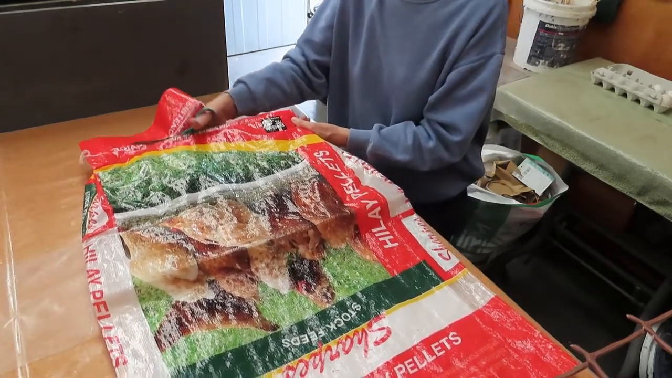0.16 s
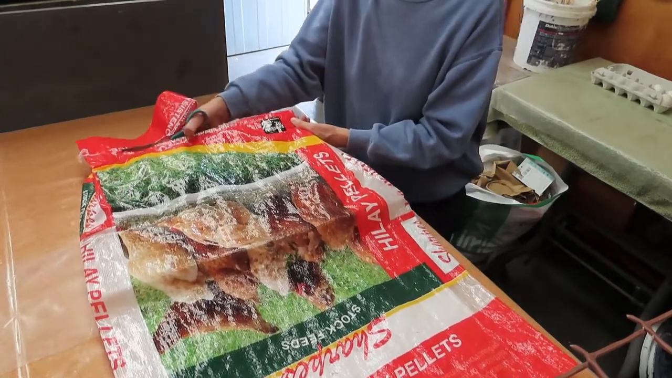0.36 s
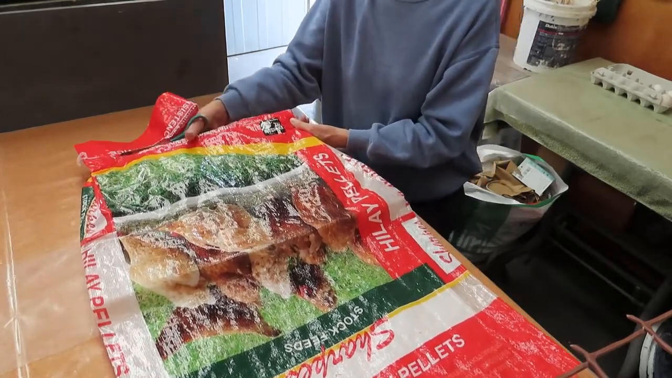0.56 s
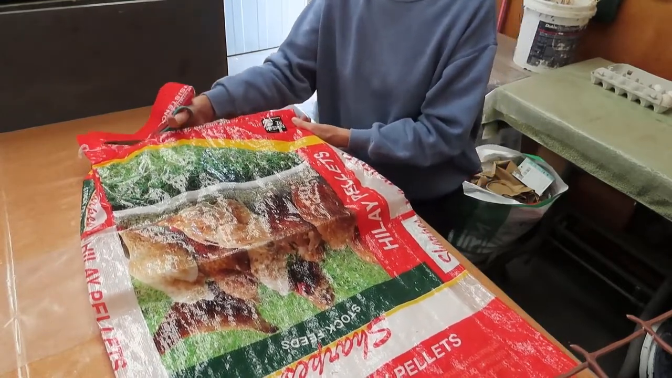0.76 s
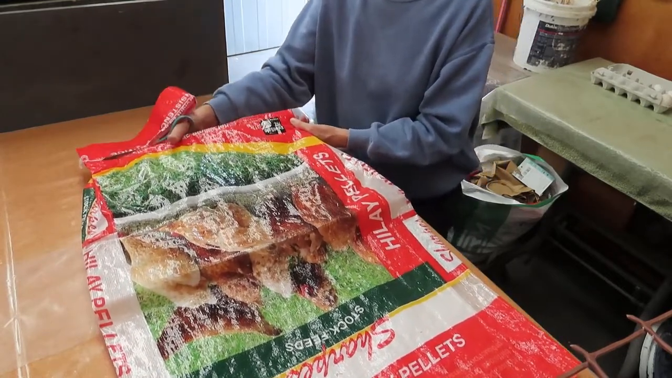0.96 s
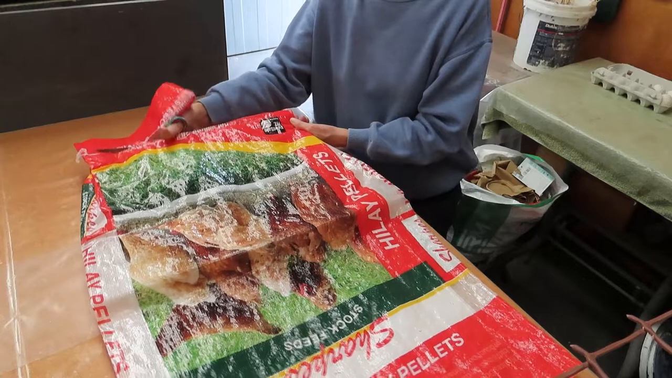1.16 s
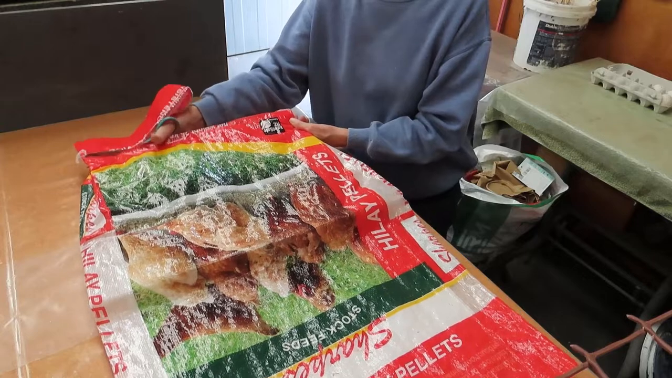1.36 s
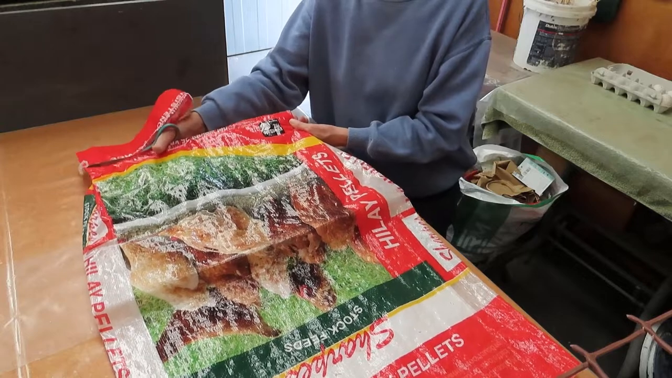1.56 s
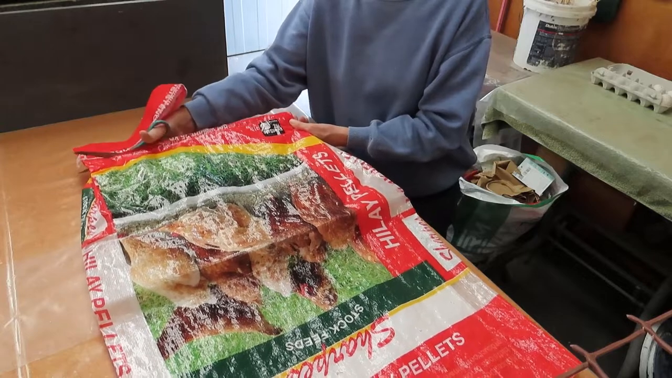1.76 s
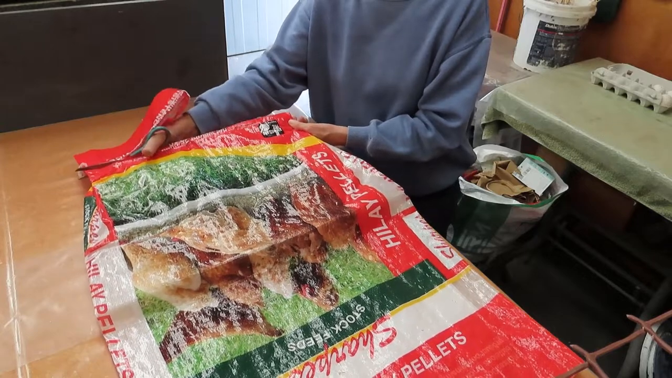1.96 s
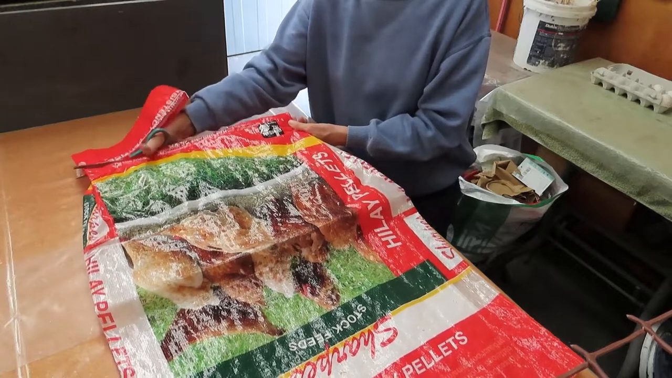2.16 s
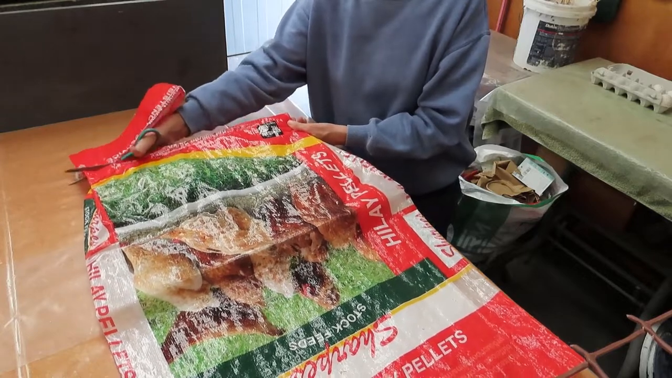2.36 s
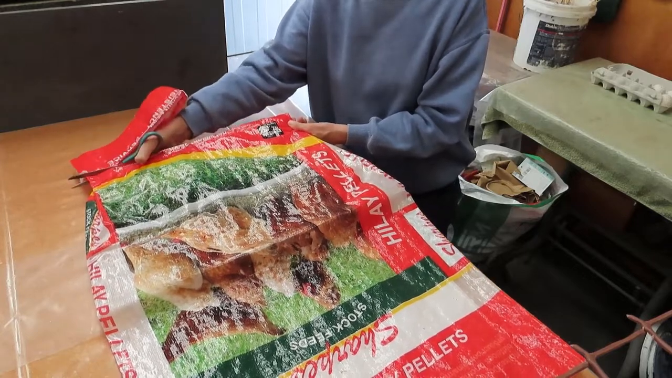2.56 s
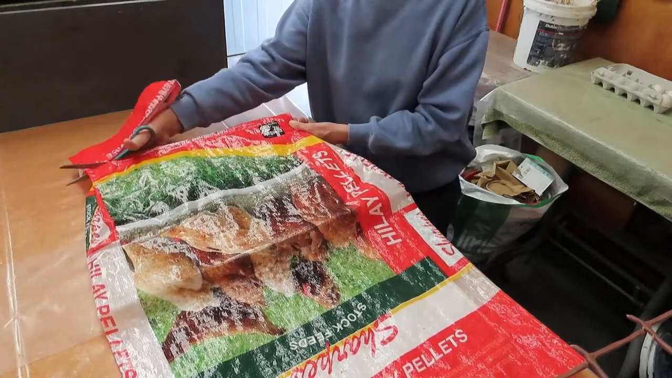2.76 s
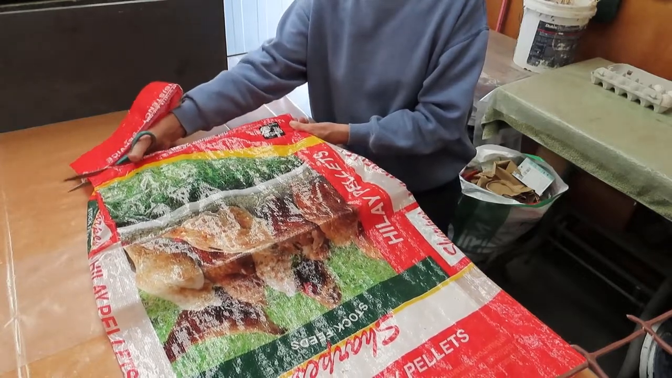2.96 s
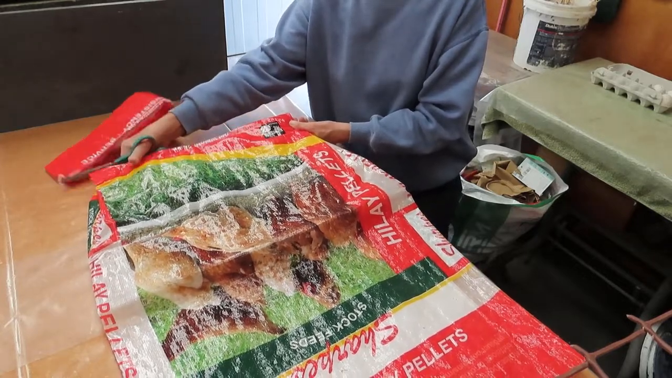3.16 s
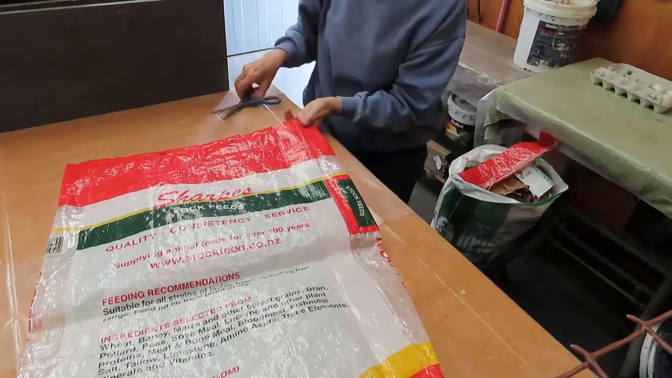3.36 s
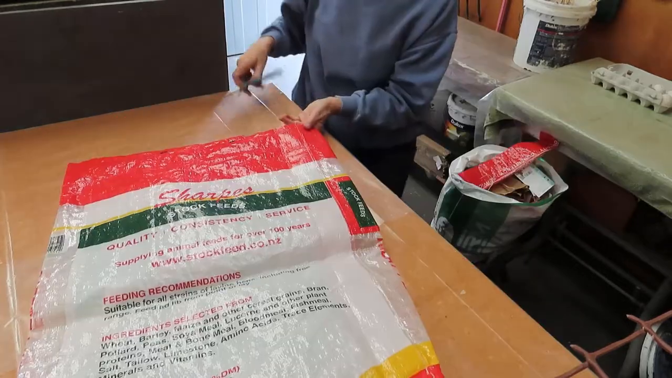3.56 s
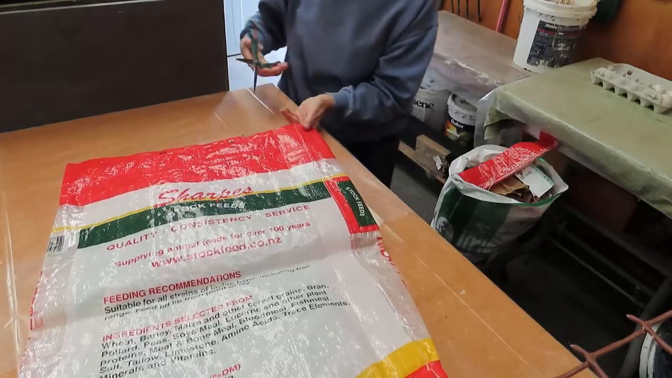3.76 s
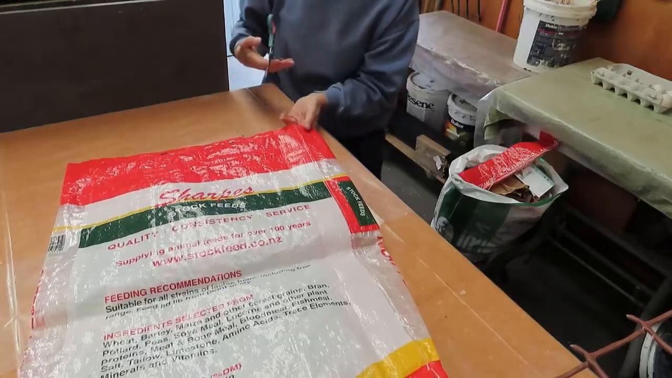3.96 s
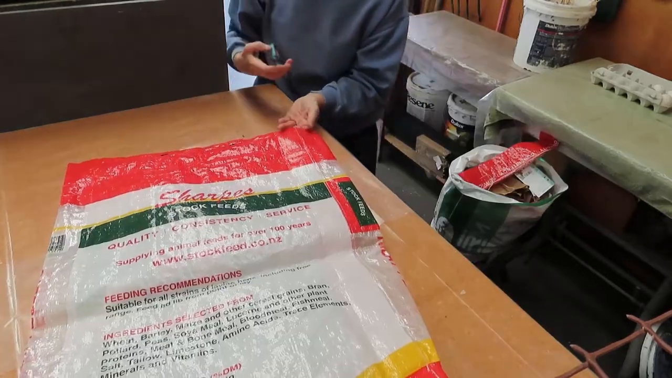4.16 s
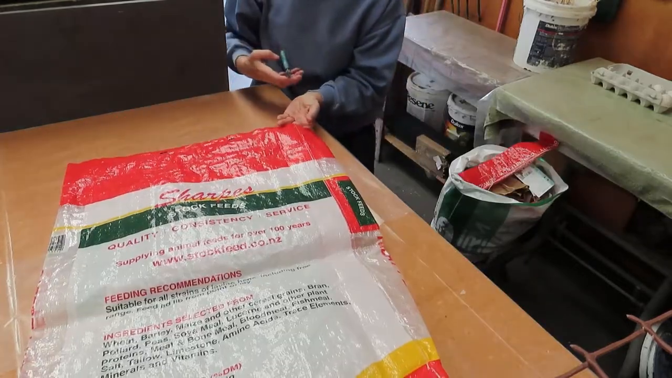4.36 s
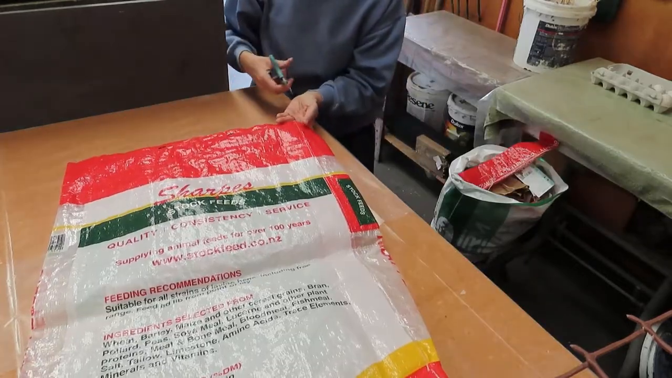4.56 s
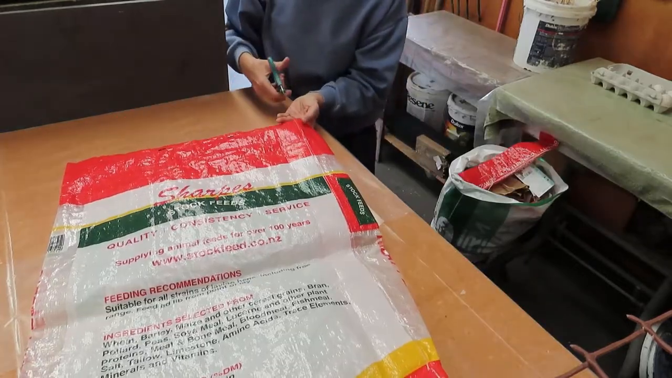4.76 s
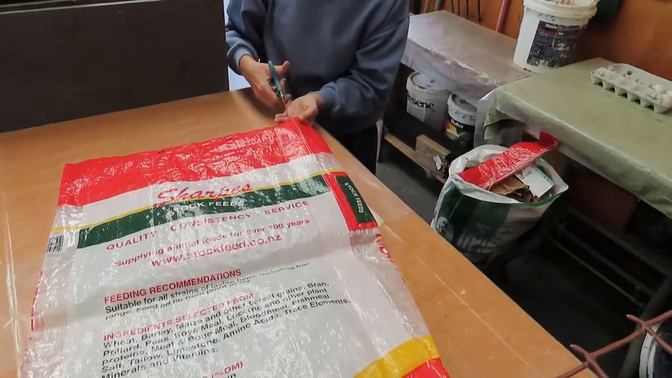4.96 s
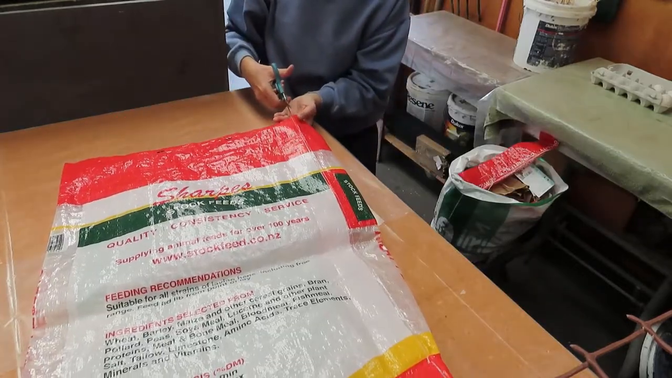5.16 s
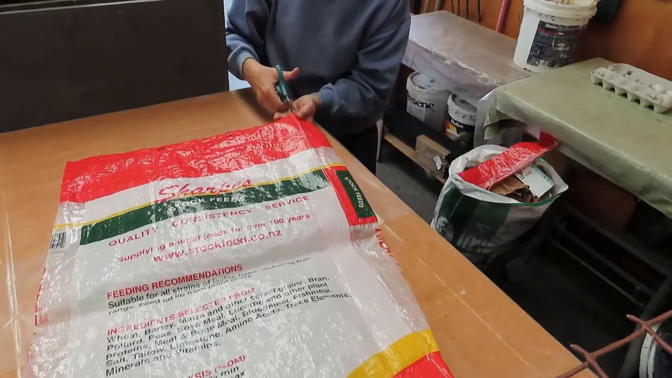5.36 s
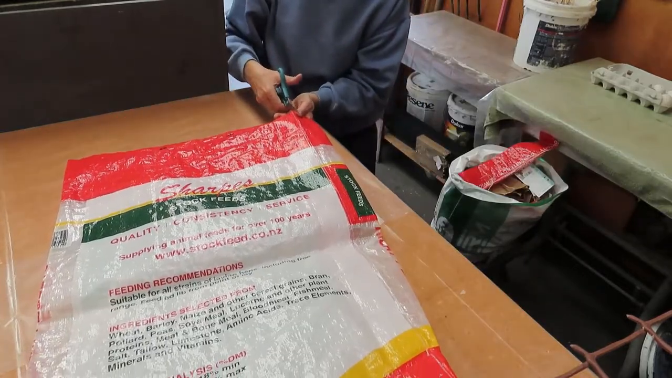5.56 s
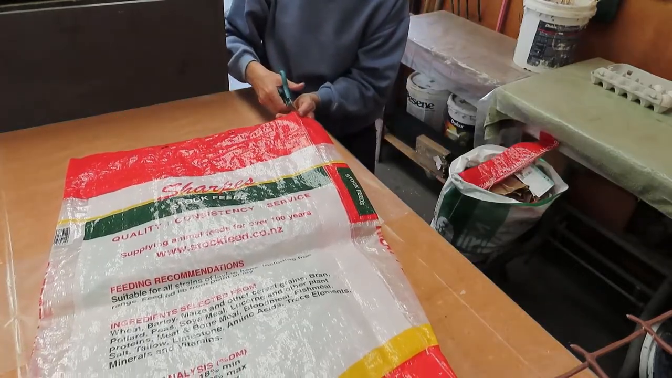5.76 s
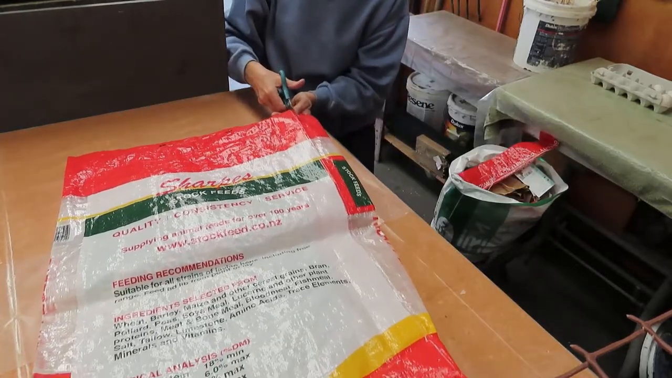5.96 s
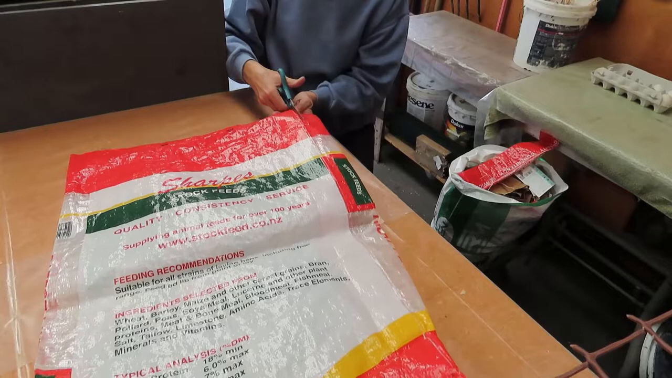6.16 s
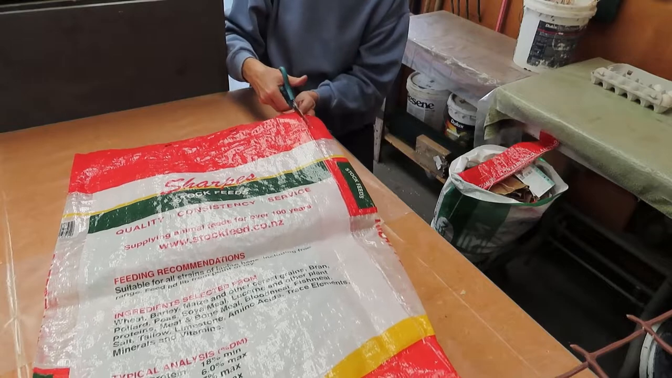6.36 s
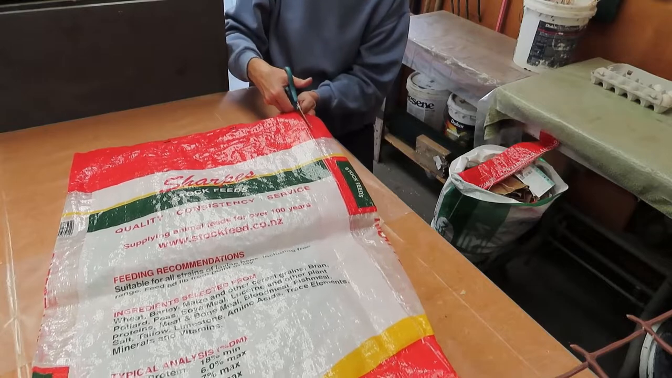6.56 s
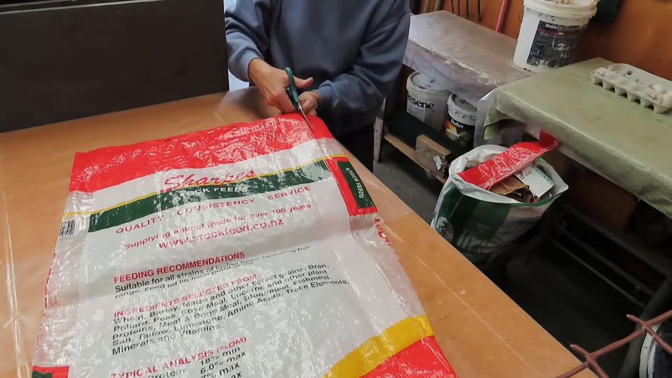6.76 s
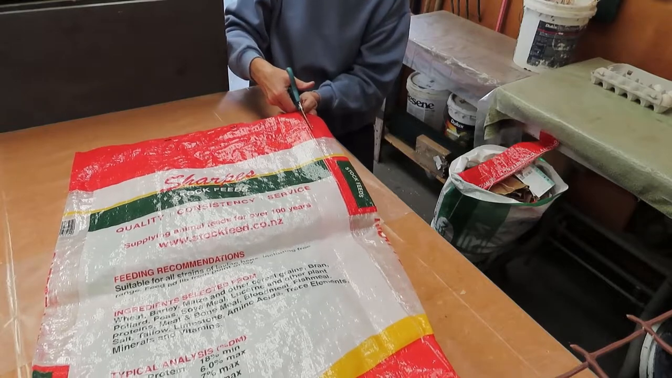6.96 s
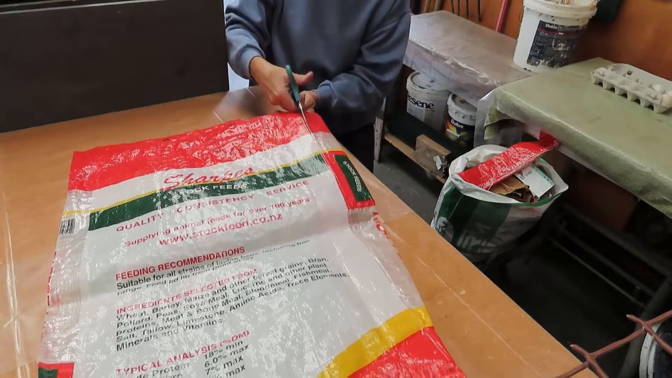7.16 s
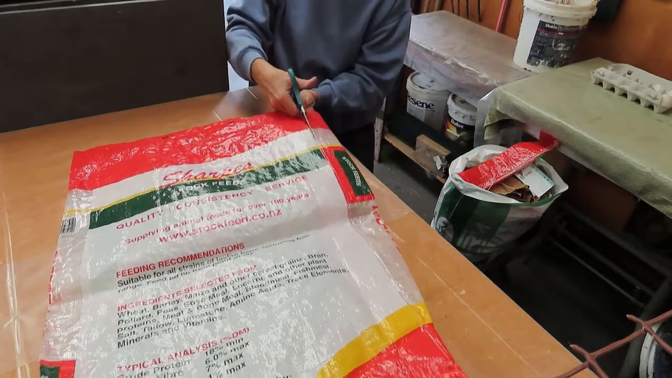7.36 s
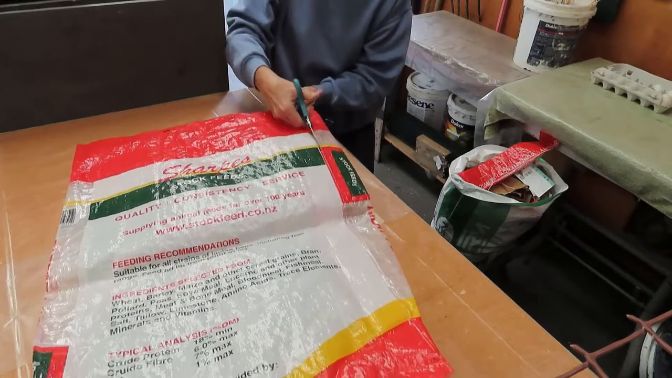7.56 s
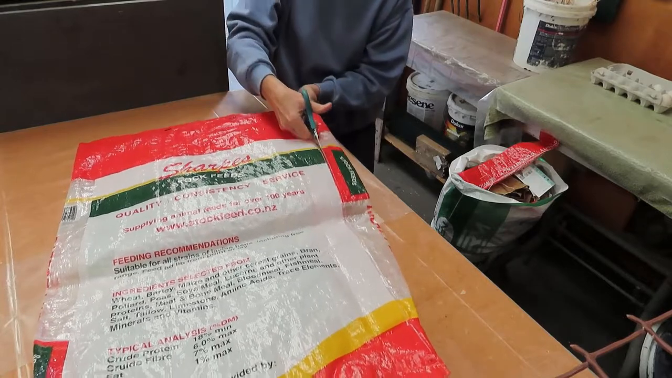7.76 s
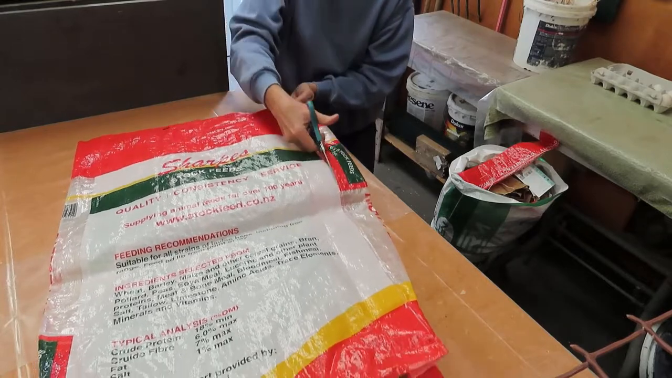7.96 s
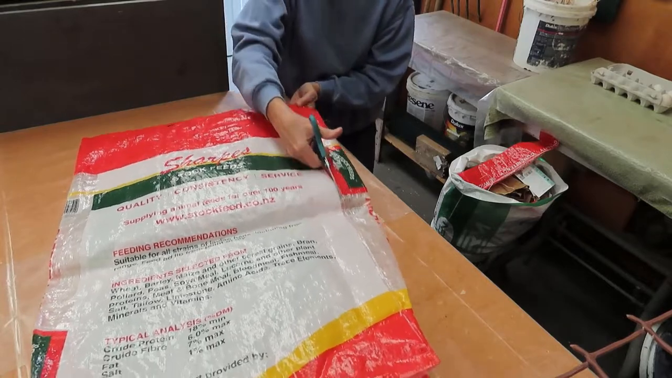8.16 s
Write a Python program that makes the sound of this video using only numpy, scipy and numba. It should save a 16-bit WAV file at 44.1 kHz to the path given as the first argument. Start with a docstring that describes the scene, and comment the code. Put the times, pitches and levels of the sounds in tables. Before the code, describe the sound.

Close in a small room, scissors work at a stiff woven plastic sack on a wooden table. Short uneven crackles and snaps come first, rather light and bright, then nearly two seconds of quiet with a few small ticks. Heavier bites into the thick hem follow, louder and denser, with a faint metallic ring, ending in a continuous crackling slide. A faint low hum and distant air noise lie beneath.

```python
"""Scissors snip through a stiff woven plastic sack on a wooden table, a metre or two away in a small room.
The cut starts in the open sheet, a little to the left, and a far rumble swells and fades near 1.7 s.
At 3.5 s the sack is turned over; from 5.2 s the blades bite the thick hem, then slide on in one push from 7.3 s.
Creases and snaps are damped rings, parting threads are bursts of treble noise, and the room adds noise echoes.
A low hum and faint distant noise, both filtered noise, run throughout."""
import sys
import numpy as np
from scipy import signal
from scipy.fft import rfft, irfft, next_fast_len
from scipy.io import wavfile
from scipy.ndimage import uniform_filter1d
from numba import njit

SR = 44100
rng = np.random.default_rng(int(sys.argv[2]) if len(sys.argv) > 2 else 0)


def generate_wav(signal):
    """Clip the signal to [-1, 1] and save it as 16-bit WAV at the path in sys.argv[1]."""
    frames = np.transpose(np.atleast_2d(signal))
    scaled = np.clip(frames, -1, 1) * 32767
    pcm = np.round(scaled).astype(np.int16)
    wavfile.write(sys.argv[1], SR, pcm)


def voltage_ratio(level):
    """Linear amplitude factor for a level in decibels (scalar or array-like)."""
    return 10 ** (np.asarray(level, float) / 20)


N = 362061  # samples
TURN_S = 3.5  # the sack is turned over: open sheet before, thick hem after


def level(x, db):
    """Scale to an rms level."""
    return x * voltage_ratio(db) / np.sqrt(np.mean(x ** 2))


def read(table, hz):
    """Value of a (f/Hz, value) table on a log-frequency axis."""
    table_hz, value = np.transpose(table)
    return np.interp(np.log(np.maximum(hz, 1)), np.log(table_hz), value)


def colour(x, table):
    """Filter with a (f/Hz, level/dB) table."""
    count = x.shape[-1]
    size = next_fast_len(count)
    gain = voltage_ratio(read(table, np.fft.rfftfreq(size, 1 / SR)))
    return irfft(rfft(x, size) * gain, size)[..., :count]


@njit
def rings(count, start, hz, cycles, size, swell):
    """Damped rings that swell for a moment and die by 60 dB over the given cycles."""
    out = np.zeros(count)
    for k in range(len(start)):
        span = int(cycles[k] * SR / hz[k])
        for i in range(min(span, count - start[k])):
            u = i / span
            envelope = (1 - np.exp(-u / swell)) ** 2 * np.exp(-np.log(1000) * u)
            out[start[k] + i] += size[k] * envelope * np.sin(2 * np.pi * cycles[k] * u)
    return out


def creases(s, size, centre_hz, spread_oct, cycles, chance):
    """One ring per crease, each with its own pitch and length; those far from the usual pitch are weak."""
    pitch, length, sign = chance[:3]
    hz = np.clip(centre_hz * 2 ** (spread_oct * pitch), 60, SR / 4)
    size = size * np.sign(sign) * voltage_ratio(-3 * pitch ** 2)
    return rings(N, (s * SR).astype(np.int64), hz, cycles * 2 ** (0.46 * length), size, 0.05)


def ticks(s, size, t60_s, low_hz):
    """Tiny bursts of treble noise as threads part."""
    spikes = np.full(N, 1e-18)
    np.add.at(spikes, (s * SR).astype(int), size)
    fall = signal.lfilter([1], [1, -np.exp(-np.log(1000) / (t60_s * SR))], spikes)
    high_pass = signal.butter(3, low_hz, "high", fs=SR, output="sos")
    return signal.sosfilt(high_pass, fall * rng.standard_normal(N))


def steady(x, db, span_s=0.05):
    """An even pull frees the same energy in every short span: a big slip leaves less for its neighbours."""
    size = int(span_s * SR)
    power = uniform_filter1d(uniform_filter1d(x ** 2, size), size)
    return x * voltage_ratio(db) / np.sqrt(power)


def crackle(count=14000, slips=800):
    """The weave gives way in stick-slip steps over a fine rustle; thick creases knock low, thin ones high."""
    end_s = N / SR
    slip_s = (np.arange(slips) + rng.uniform(0, 1, slips)) * end_s / slips
    slip_db = 3.4 * rng.standard_normal(slips)
    which = rng.integers(0, slips, count)
    lag_s = 0.003 * rng.exponential(1, count)
    # two creases in three are strewn regardless of the slips and stay small
    fine = np.arange(count) % 3 > 0
    slipping_s = np.minimum(slip_s[which] + lag_s, (N - 1) / SR)
    s = np.where(fine, rng.uniform(0, end_s, count), slipping_s)
    chance = rng.standard_normal((count, 11)).T

    # the patch that buckles wanders: neighbours share a drift in pitch, opposite for thick and thin
    drift = np.interp(s, np.linspace(0, end_s, slips // 6), rng.standard_normal(slips // 6))
    chance[[0, 3]] = 0.9 * chance[[0, 3]] + 0.7 * drift * np.array([[1], [-1]])
    size = voltage_ratio(np.where(fine, -6, slip_db[which]) + np.minimum(3 * rng.exponential(1, count), 9))

    # thin creases of the hem ring in a narrower range
    thin_hz, thin_oct = np.where(s < TURN_S, 2940, 3150), np.where(s < TURN_S, 0.43, 0.26)
    thick = steady(creases(s, size, 1060, 0.59, 4.1, chance[:3]), -5.5)
    thin = steady(creases(s, size, thin_hz, thin_oct, 4.7, chance[3:6]), -7)
    low = steady(creases(s, size, 286, 0.5, 4.9, chance[6:9]), -6.5)

    # thin threads tick higher and far less evenly than thick ones
    thick_tick = ticks(s, size * voltage_ratio(1.4 * chance[9]), 0.029, 3120)
    thin_tick = ticks(s, size * voltage_ratio(8.6 * chance[10] - 5), 0.0042, 9000)
    tick = steady(thick_tick + thin_tick, 6.1)

    # the sack never lies quite still between strokes
    settle = voltage_ratio(-75) * (thick + voltage_ratio(-6) * thin + voltage_ratio(-0.5) * tick)
    return settle + np.sum(work() * [thick, thin, tick, low], axis=0)


def work():
    """Gains of the four layers: effort drives all, a taut sheet adds thin creases and ticks."""
    # strokes of the blades and tugs of the hand: [t/s, length/s, effort level/dB, tautness/dB]
    stroke_table = [(0, 0.047, -40, -8), (0.16, 0.088, -48.5, -3.5), (0.244, 0.11, -59, 2.5),
                    (0.383, 0.11, -43, -2), (0.619, 0.16, -49.5, -1.5), (0.914, 0.14, -43, -1.5),
                    (1.151, 0.12, -48, -4), (1.383, 0.07, -48.5, -5.5), (1.546, 0.04, -44, -5),
                    (1.688, 0.2, -52.5, -6.5), (1.924, 0.081, -40.5, 2.5), (1.979, 0.13, -51.5, -4),
                    (2.172, 0.17, -52, -2.5), (2.407, 0.13, -56.5, 9.5), (2.714, 0.11, -60, 2),
                    (2.962, 0.12, -48.5, 0.5), (3.097, 0.097, -50.5, -4), (3.28, 0.16, -68, 4),
                    (5.209, 0.265, -57.5, -11), (5.492, 0.066, -55.5, -7), (5.741, 0.017, -37.5, -2.5),
                    (5.905, 0.14, -34.5, -7), (6.103, 0.071, -31.5, -6.5), (6.434, 0.06, -34.5, -6),
                    (6.508, 0.063, -36.5, -1.5), (6.945, 0.014, -34, 4.5), (7.145, 0.12, -41, 10.5),
                    (7.211, 0.082, -39, -10)]
    # the open blades slide through the cloth in one push: [t/s, effort level/dB, tautness/dB]
    slide_table = [(7.334, -56, 10), (7.348, -36.5, 0.5), (7.41, -39, -2.5), (7.56, -39, 2.5),
                   (7.7, -43, 2.5), (7.83, -36, -1.5), (7.9, -34.5, 0.5), (7.97, -39, -0.5),
                   (7.995, -41.5, -3), (8.075, -39, -3), (8.095, -33.5, -1.5), (8.15, -38, -4),
                   (8.17, -35.5, -7)]
    # ticks re effort, and their growth per dB of tautness
    tick_sheet_db, tick_hem_db, tick_per_taut = -3.5, -8.5, 0.98

    start, length, db, taut_db = np.transpose(stroke_table)
    tick_db = np.where(start < TURN_S, tick_sheet_db, tick_hem_db) + tick_per_taut * np.minimum(taut_db, 6)
    # low folds: -69 dB at a usual effort of -46 dB, growing 0.59 dB per dB
    fold_db = -69 + 0.59 * (db + 46)
    strokes = [effort(start, length, d) for d in (db, db + taut_db, db + tick_db, fold_db)]

    t = np.arange(N) / SR
    s, db, taut_db = np.transpose(slide_table)
    # the last offset is for low folds as the sack is pushed along the table
    offsets_db = (0, taut_db, tick_hem_db + tick_per_taut * taut_db, -9.5)
    slide = [voltage_ratio(np.interp(t, s, db + d)) * (t > s[0]) for d in offsets_db]
    return np.add(strokes, slide)


def effort(start, length, db, edge_s=0.015):
    """Gain over time: strokes bite quickly into the hem and swell half as fast in the open sheet."""
    steps = np.zeros(N + SR)
    np.add.at(steps, (start * SR).astype(int), voltage_ratio(db))
    np.add.at(steps, ((start + length) * SR).astype(int), -voltage_ratio(db))
    gain, size = np.cumsum(steps)[:N], int(edge_s * SR)
    in_sheet = np.arange(N) < TURN_S * SR
    return np.where(in_sheet, uniform_filter1d(gain, 2 * size), uniform_filter1d(gain, size))


def snaps(count=10):
    """A loud snap knocks at its own pitch and sets off a cluster of neighbouring creases and a tick."""
    # single loud snaps: [t/s, blow level/dB, ring f/Hz]
    snap_table = [(0.027, -29, 980), (0.066, -33.5, 1580), (0.184, -28.5, 980), (0.299, -26.5, 1800),
                  (0.41, -23, 724), (0.444, -21.5, 710), (0.461, -27, 875), (0.481, -20.5, 1260),
                  (0.965, -18, 2870), (1.023, -39, 1490), (1.242, -24.5, 890), (1.399, -20.5, 1420),
                  (1.517, -28.5, 1510), (1.548, -17, 1400), (1.567, -21.5, 1590), (1.954, -13.5, 830),
                  (2.081, -26.5, 1140), (2.178, -31, 1050), (2.434, -24, 1550), (2.45, -17.5, 1540),
                  (2.496, -26.5, 1280), (2.515, -18.5, 1180), (2.714, -43, 1810), (2.977, -36, 1010),
                  (3.002, -26, 1310), (3.043, -19, 806), (3.092, -14, 1010), (3.097, -17, 640),
                  (3.291, -31, 1140), (3.725, -35, 3350), (3.84, -41, 3200), (3.941, -29, 664),
                  (4.431, -19, 900), (5.3, -21.5, 1220), (5.708, -30.5, 765), (5.738, -28.5, 790),
                  (5.806, -23, 910), (5.91, -21.5, 1180), (5.924, -28, 990), (5.935, -15.5, 930),
                  (5.954, -13.5, 1260), (5.995, -15, 1110), (6.024, -15.5, 930), (6.119, -19.5, 930),
                  (6.133, -12.5, 920), (6.155, -12.5, 920), (6.301, -11, 1020), (6.425, -23, 1270),
                  (6.438, -22.5, 770), (6.464, -11, 870), (6.514, -14, 890), (6.554, -16.5, 945),
                  (6.703, -21.5, 3140), (6.71, -13, 990), (6.85, -37, 2500), (6.944, -12.5, 955),
                  (7.133, -24.5, 1070), (7.161, -9.5, 2700), (7.182, -12, 2920), (7.199, -7.5, 3000),
                  (7.244, -10, 1550), (7.393, -12.5, 865), (7.41, -13, 880), (7.439, -17, 860),
                  (7.712, -17.5, 3300), (7.861, -20.5, 900), (7.956, -16, 845), (8.157, -14.5, 860),
                  (8.195, -20.5, 920)]
    s, blow_db, hz = np.transpose(snap_table)
    start, size, same = (s * SR).astype(np.int64), voltage_ratio(blow_db), np.ones(len(s))
    main = rings(N, start, hz, 5.5 * same, -size, 0.077)

    # neighbours follow within milliseconds and cover the range of pitches evenly
    near = rng.standard_normal((len(s) * count, 4)).T
    late = np.repeat(s, count) + 0.0034 * near[3] ** 2
    near[0] = np.tile(np.linspace(-1.5, 1.5, count), len(s))
    near_size = np.repeat(size, count) * voltage_ratio(-4.5)
    near_hz, near_oct = np.where(late < TURN_S, 2700, 2900), np.where(late < TURN_S, 0.75, 0.55)
    cluster = creases(late, near_size, near_hz, near_oct, 3.62, near)

    # the blades ring for 27 cycles when they bite the hem
    blades = rings(N, start, 3070 * same, 27 * same, size * voltage_ratio(-11.5) * (s > TURN_S), 0.18)
    tick_db = np.where(s < TURN_S, -7, -18.5)  # re blow
    return main + cluster + blades + ticks(s, size * voltage_ratio(tick_db), 0.032, 3940)


def threads():
    """A thin thread parts with only the highest part of a tick, mostly alone, sometimes along with a snap."""
    # thin threads: [t/s, level/dB]
    thread_table = [(0.287, -28), (0.302, -42), (0.383, -31), (0.405, -22), (0.736, -32), (1.49, -23),
                    (1.831, -44), (1.924, -23), (1.938, -12), (2.352, -36), (2.434, -20), (2.767, -33),]
    s, db = np.transpose(thread_table)
    return ticks(s, voltage_ratio(db), 0.014, 7500)


def bumps():
    """The hand and scissors settle on the table with dull knocks."""
    # soft bumps on the table top: [t/s, blow level/dB, f/Hz]
    bump_table = [(3.096, -35, 107), (3.372, -44, 597), (3.385, -41.5, 240), (3.943, -39.5, 339),
                  (6.515, -40, 337), (6.946, -35, 318)]
    s, blow_db, hz = np.transpose(bump_table)
    return rings(N, (s * SR).astype(np.int64), hz, hz * 0.057, voltage_ratio(blow_db), 0.004)  # each lasts 57 ms


def ports(x):
    """Direct sound at the two ports: the first cut reaches the left sooner and louder, later work is central."""
    lead_s, louder_db = 2.2e-5, 0.4  # left re right
    early = x * (np.arange(N) < TURN_S * SR)
    size = next_fast_len(N)
    turn = np.array([[1], [-1]]) / 2
    shift = np.exp(2j * np.pi * np.fft.rfftfreq(size, 1 / SR) * lead_s * turn)
    return x - early + voltage_ratio(louder_db * turn) * irfft(rfft(early, size) * shift, size)[:, :N]


def room(x, wet_db=-5, gap_s=0.0041, t60_s=0.39, places=6):
    """Walls and table return dense echoes; mid and side come from unrelated paths."""
    # how much the room differs between the two ports: [f/Hz, side re mid level/dB]
    room_side = [(60, -24), (250, -11), (700, -59), (1500, -16.5), (4000, -8), (15000, 5.5)]
    t = np.arange(int(0.6 * SR)) / SR
    echo = np.exp(-np.log(1000) * t / t60_s) * rng.standard_normal((places, 2, len(t)))
    # the first echoes off the table come close and strong
    echo = echo * (t > gap_s) * (1 + 2.2 * np.exp(-t / 0.007))
    echo = echo / np.sqrt(np.sum(echo ** 2, axis=2, keepdims=True))

    # the hands move along the sack, each place with its own echoes
    step = N // places + 1
    wet = np.zeros((2, places * step + len(t)))
    for k in range(places):
        part = signal.fftconvolve(x[None, k * step:(k + 1) * step], echo[k], axes=1)
        wet[:, k * step:k * step + part.shape[1]] += part
    mid, side = voltage_ratio(wet_db) * wet[:, :N]
    side = colour(side, room_side)
    return ports(x) + np.array([mid + side, mid - side])


def air():
    """Steady distant noise, wavering hums of narrow-band noise and one passing rumble."""
    # spectral shape of the distant noise: [f/Hz, relative level/dB]
    air_shape = [(25, -6.5), (55, 3), (140, -4.5), (500, -11.5), (1000, -11.5), (1400, -17.5),
                 (4000, -24.5), (15000, -50)]
    # its spread over the ports: [f/Hz, side re mid level/dB]
    air_side = [(40, -32), (110, -9.5), (300, -1), (6000, -8), (15000, 5)]
    # hums: [f/Hz, width/Hz, level/dB]
    hum_table = [(47.6, 11, -65.5), (108, 8.1, -65.5), (132.6, 2.6, -69.5), (700, 9.1, -72.5)]

    mid, side = level(colour(rng.standard_normal((2, N)), air_shape), -60)
    for hz, width, db in hum_table:
        b, a = signal.iirpeak(hz, hz / width, fs=SR)
        mid = mid + level(signal.lfilter(b, a, rng.standard_normal(N)), db)

    # a far rumble at 37.8 Hz swells and fades around 1.7 s
    b, a = signal.iirpeak(37.8, 2, fs=SR)
    rumble = signal.lfilter(b, a, signal.lfilter(b, a, rng.standard_normal(N)))
    swell = np.exp(-((np.arange(N) / SR - 1.7) / 0.55) ** 2)
    mid = mid + swell * level(rumble, -59.5)
    side = colour(side, air_side)
    return np.array([mid + side, mid - side])


def scene():
    """The sack in the room, over the air."""
    # colour of sack, table top and microphone together: [f/Hz, level/dB]
    sheet = [(120, 1), (400, 3), (1500, 6), (3000, 4), (4500, -1), (9000, -7.5), (15000, -14.5),
             (16400, -47)]
    sack = colour(crackle() + snaps() + threads(), sheet)
    return room(sack + bumps()) + air()


def low_pass(x):
    """Removes everything above the highest recorded frequency."""
    return signal.sosfilt(signal.butter(12, 16520, fs=SR, output="sos"), x)


def record(dry):
    """A steep low-pass cuts the top above 16150 Hz."""
    cut = signal.sosfilt(signal.ellip(8, 0.2, 70, 16150, fs=SR, output="sos"), dry)
    return low_pass(cut)


dry = scene()
out = record(dry)
generate_wav(out)
```